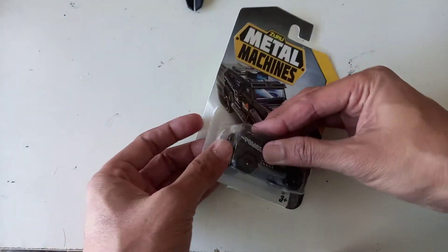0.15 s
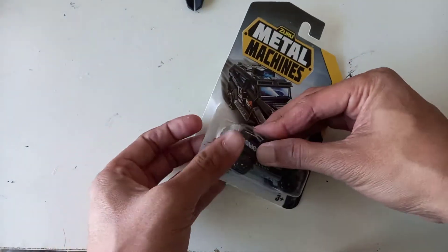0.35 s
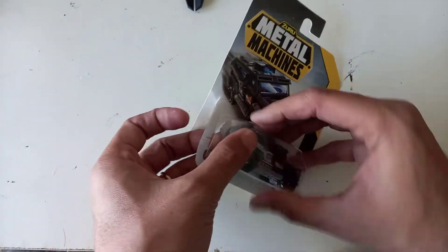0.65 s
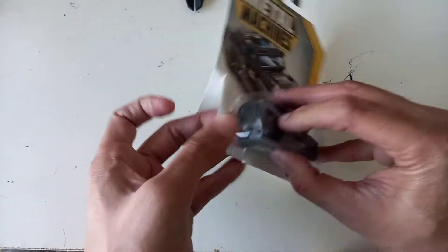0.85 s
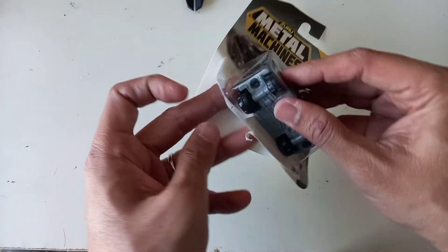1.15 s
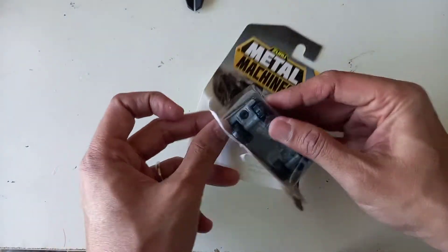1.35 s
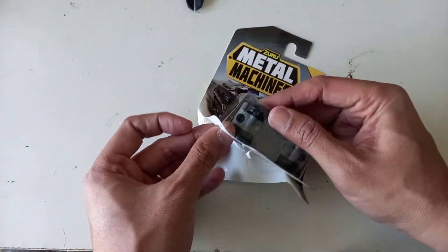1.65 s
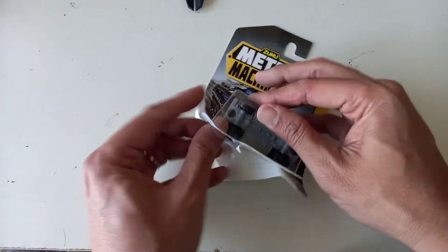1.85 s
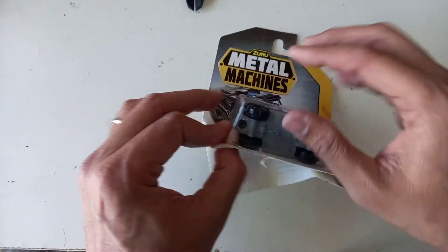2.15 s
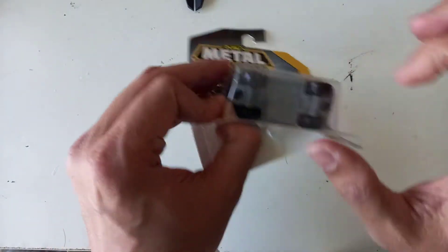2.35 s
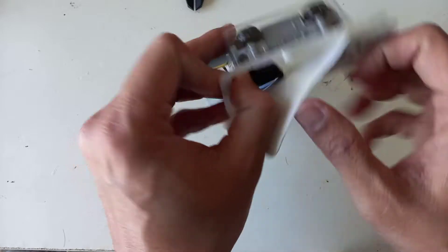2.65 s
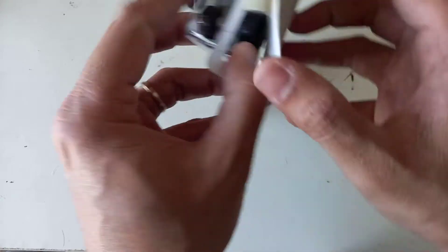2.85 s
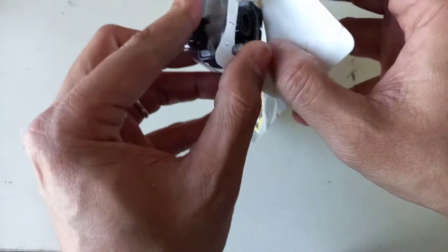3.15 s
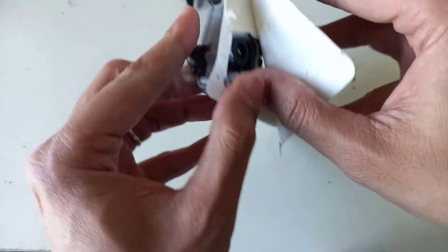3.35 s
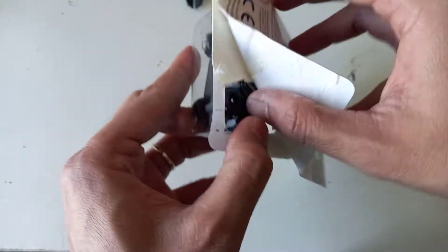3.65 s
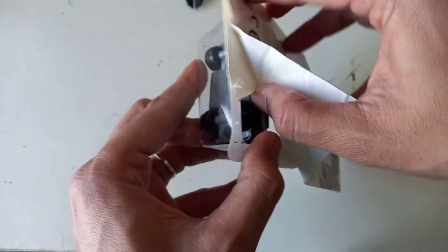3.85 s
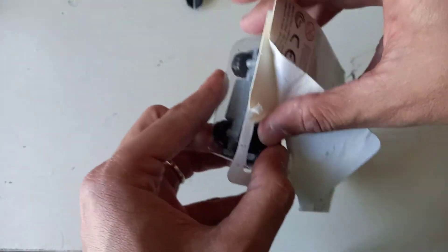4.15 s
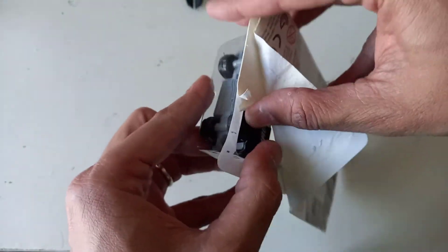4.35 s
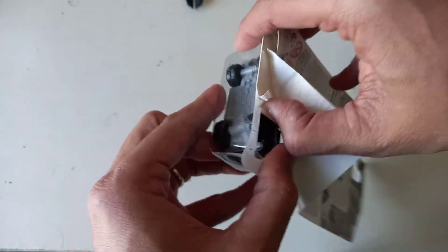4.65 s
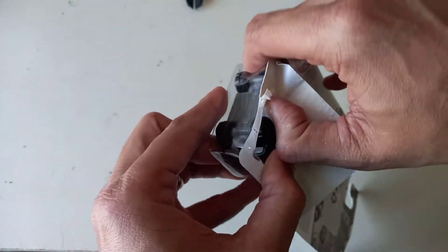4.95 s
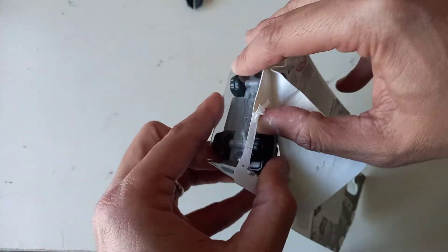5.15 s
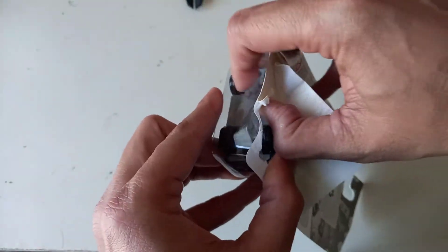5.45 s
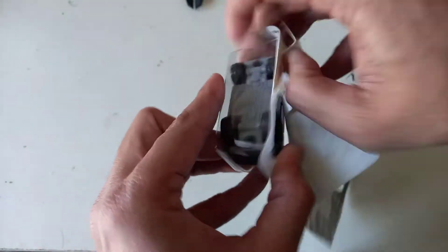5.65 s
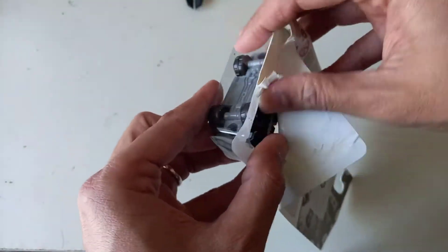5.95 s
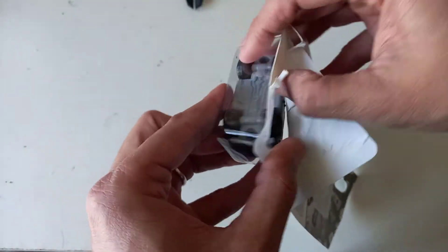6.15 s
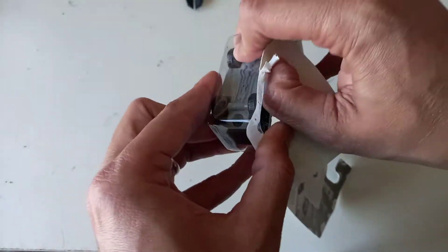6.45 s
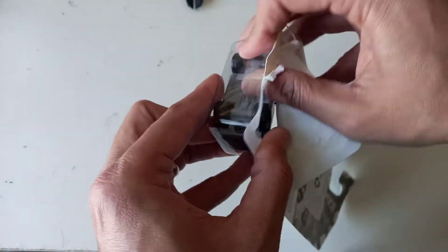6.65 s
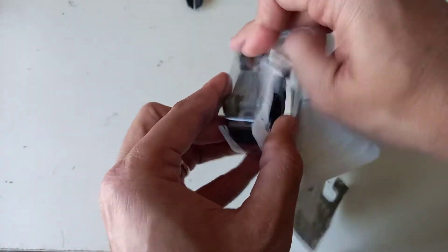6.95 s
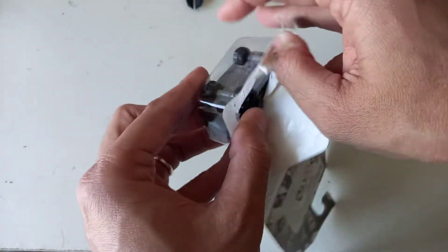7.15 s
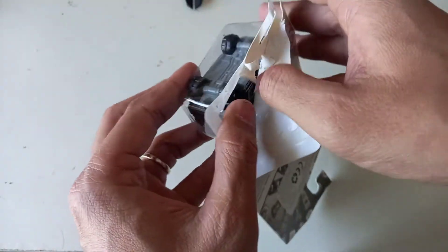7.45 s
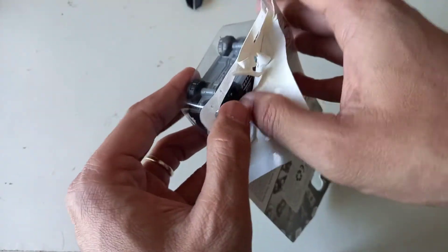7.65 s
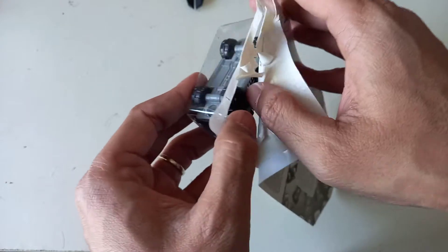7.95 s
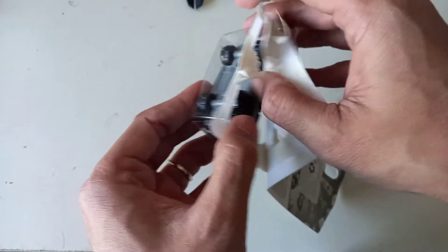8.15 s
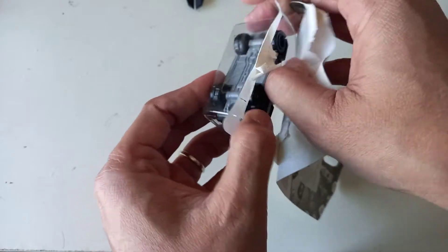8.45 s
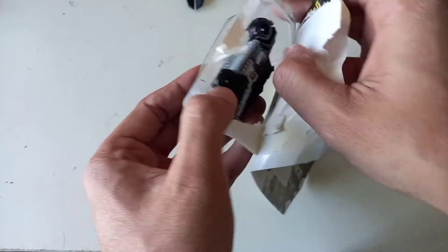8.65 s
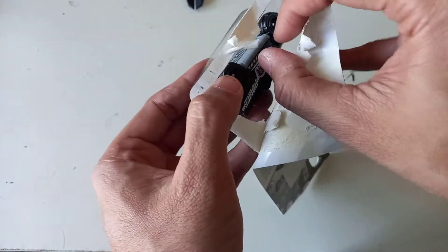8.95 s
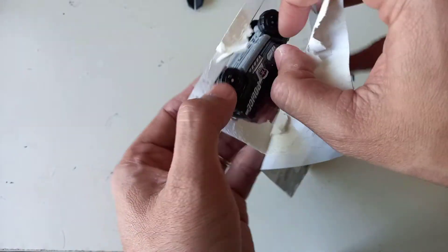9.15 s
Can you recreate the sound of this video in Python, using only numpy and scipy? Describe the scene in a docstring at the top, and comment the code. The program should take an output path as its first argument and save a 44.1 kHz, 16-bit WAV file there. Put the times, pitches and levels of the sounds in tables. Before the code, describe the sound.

Thin stiff plastic pops, creaks and crinkles as fingers tear cardboard away in short bursts, hardest around five and seven seconds, very close indoors.

```python
"""A small room, close above a table: two hands peel a card off a plastic blister pack before two microphones.
The thin shell snaps in ringing panel modes and creaks in resonances driven by slips; its hardest snap rings on.
The card gives way in band-filtered bursts of fibre breaks: short rips, fine peeling crackle, ticks and glue clicks.
Fingers rub, bump and once squeak; shaped noise makes the hands and the quiet room tone, a noise tail the room.
"""
import sys
import numpy as np
from scipy import signal
from scipy.fft import irfft, next_fast_len
from scipy.io import wavfile
from scipy.ndimage import uniform_filter1d

SR = 44100
rng = np.random.default_rng(int(sys.argv[2]) if len(sys.argv) > 2 else 0)


def transcribe(signal):
    """Save signal, clipped to [-1, 1], as a 16-bit WAV file at the path in sys.argv[1]."""
    frames = np.atleast_2d(signal).T
    limited = np.clip(frames, -1, 1)
    pcm = np.round(limited * 32767).astype(np.int16)
    wavfile.write(sys.argv[1], SR, pcm)


N = 410561
TIME = np.arange(N) / SR
HZ = np.fft.rfftfreq(next_fast_len(N, True), 1 / SR)

# levels of the pack's sounds are set before the 2 dB lift and left-right lean at the microphones
# left-right likeness of the thump, body, crack and fizz bands, in that order [0-1]
LIKENESS = [0.83, 0.4, 0.12, 0.043]
# dull noise of the hands: (frequency [Hz], relative level [dB])
HAND_SPECTRUM = [(36, -28), (50, -2.5), (64, -4.5), (105, 5), (145, -3.5), (185, 3.5), (225, -7),
                 (410, -7.5), (600, -20.5), (1500, -62.5)]
# the shell buckles: (time [s], level [dB], panel pitch [Hz], thump re level [dB], crack re level [dB])
SHELL_SNAPS = [(.5936, -41.5, 974, -2, -32), (.8426, -39.5, 1670, -9, -11), (.865, -46, 1190, -16, -23),
               (0.896, -36, 800, -2.5, -28), (0.9219, -25.5, 1185, -15, -9),
               (1.142, -30.5, 1416, -10.5, -16.5), (1.433, -25, 1173, -33, -32),
               (1.4662, -39.5, 1290, -6.5, -10.5), (1.5674, -35.5, 974, -28, -23),
               (1.7536, -26, 1185, -7, -20.5), (1.8182, -32, 1410, -15.5, -10.5),
               (1.8875, -41.5, 1700, -16, -18), (2.4, -47, 1550, -12, -11), (2.492, -50.5, 930, -10, -29),
               (2.6645, -38.5, 1320, -33, -11.5), (2.7066, -32, 1420, -24, -11),
               (2.9102, -42, 1610, 5, -34), (3.412, -46, 1620, -2, -10.5),
               (3.6355, -43.5, 1646, -6.5, -6.5), (4.082, -38, 1315, -14.5, -12),
               (4.5607, -43, 1320, -9, -10.5), (4.6519, -33.5, 1710, -2.5, 0.5),
               (4.6758, -34.5, 1574, -6, 0.5), (4.86, -36, 1420, -6, -13), (4.9027, -27.5, 1630, -13, -4.5),
               (5.0614, -31.5, 1450, -13, -17), (5.0786, -17, 1543, -14, -13.5),
               (5.2517, -45.5, 1040, -6, -6.5), (5.3211, -39.5, 1444, -7.5, -8.5),
               (5.425, -28.5, 985, -22, -14), (5.5489, -35.5, 2410, -12, -1), (5.5548, -36, 2300, -33, 6),
               (5.5892, -30, 1700, -5.5, 3), (5.7224, -36, 1530, -5.5, -16), (5.954, -48.5, 1130, 2, -6.5),
               (6.1264, -37.5, 1610, -9.5, -12), (6.1859, -45.5, 860, 7, -7), (6.2252, -40, 1820, -33, 4),
               (6.3468, -32, 2360, -15.5, -2), (6.37, -38.5, 1420, -16, -21), (6.394, -42.5, 910, 1, -6),
               (6.6536, -44, 840, 0.5, -1.5), (6.7954, -45.5, 2150, -22.5, 0),
               (6.8771, -37, 1500, -5, -6.5), (6.897, -41, 2570, -9, 9.5), (6.9111, -30.5, 1660, -7, 0),
               (6.9281, -20, 824, -14.5, -7), (6.9416, -36, 1640, -3, 7.5),
               (6.9665, -20.5, 1653, -17.5, 0.5), (7.0051, -28.5, 1390, -11.5, -25.5),
               (7.065, -24, 1500, -15, -25), (7.1057, -38, 1000, -13, 1), (7.2815, -44, 1620, -9, -11),
               (7.3743, -34, 1660, -13, -7), (7.3875, -39, 1480, 0, -5.5), (7.9921, -38, 1620, -12, -4),
               (8.1336, -34.5, 2290, -27, 4.5), (8.211, -38.5, 1380, -16, 6), (8.3938, -40, 1500, -22, 3.5),
               (8.431, -37, 1500, -18, -2), (8.4472, -40, 1890, -22, 10)]


def amp(db):
    """Decibels to gain."""
    return 10 ** (np.asarray(db) / 20)


def evened(x):
    """Scales to rms 1, over all channels together."""
    return x / np.sqrt(np.mean(x ** 2) + 1e-20)


def read(points, hz):
    """Reads a spectrum on a log-frequency axis."""
    f, value = np.transpose(points)
    return np.interp(np.log(hz + 1), np.log(f + 1), value)


def follow(rows):
    """One curve over time for each column after the first, which holds the times."""
    s, *columns = np.transpose(rows)
    return [np.interp(TIME, s, column) for column in columns]


def add(mix, s, sound):
    """Mixes a stereo sound in at time s."""
    part = mix[:, max(round(s * SR), 0):][:, :sound.shape[1]]
    part += sound[:, :part.shape[1]]


def pair(x, same):
    """Blends two unrelated rows into a left and right of the given likeness."""
    same = np.clip(same, 0, 1)
    mid = np.sqrt((1 + same) / 2) * x[0]
    side = np.sqrt((1 - same) / 2) * x[1]
    return np.array([mid + side, mid - side])


def through(x, response):
    """Passes both channels through a response."""
    return signal.oaconvolve(x, response[None], axes=1)[:, :x.shape[1]]


def pack_band(lo, hi, size=2048, order=14):
    """Card and shell colour the sound between two borders [Hz]: a causal, minimum-phase response."""
    # colour of card and shell: (frequency [Hz], relative level [dB])
    colour = [(200, -13), (410, -1), (570, -7), (790, -3), (1000, -0.5), (1650, 5), (2050, -4.5),
              (2600, -7), (3100, -10), (4500, -10), (6750, -11), (7900, -25), (12000, -20), (16000, -28)]
    hz = np.abs(np.fft.fftfreq(size, 1 / SR)) + 1
    edges = np.sqrt((1 + (lo / hz) ** order) * (1 + (hz / hi) ** order))
    gain = amp(read(colour, hz)) / edges
    log_gain = np.log(np.maximum(gain / gain.max(), 1e-4))
    # the Hilbert transform of the log gain gives the minimum phase
    spectrum = np.exp(np.conj(signal.hilbert(log_gain)))
    return np.fft.ifft(spectrum).real[:size // 2]


def murky(spectrum, same):
    """Steady stereo noise of a given spectrum, at rms 1."""
    noise = rng.standard_normal((2, len(HZ))) + 1j * rng.standard_normal((2, len(HZ)))
    return evened(irfft(pair(noise, same) * amp(read(spectrum, HZ)))[:, :N])


def clumps(length_s):
    """Random curve of rms 1: straight lines between draws that lie length_s apart."""
    draws = rng.standard_normal(N // 100)
    return evened(np.interp(TIME / length_s, np.arange(len(draws)), draws))


def fibres(count, per_s, spread_db, hiss):
    """Two rows of tiny breaks at shared moments, a few of them large, over smooth friction."""
    size = amp(spread_db * np.minimum(rng.exponential(1, count), 4))
    size *= rng.random(count) < per_s / SR
    breaks = evened(size * rng.standard_normal((2, count)))
    return breaks + hiss * rng.standard_normal((2, count))


def resonate(x, hz, width):
    """A steep two-pole-pair resonance that can follow a moving pitch; width sets its pole radius [Hz]."""
    turn = np.exp(2j * np.pi * np.cumsum(hz * np.ones(x.shape[1])) / SR)
    r = np.exp(-np.pi * abs(width) / SR)
    # turned down to 0 Hz, smoothed there and turned back up
    smooth = signal.lfilter([(1 - r) ** 2], [1, -2 * r, r * r], x / turn)
    return (turn * smooth).real


def room_tone():
    """The quiet room: steady, wide noise."""
    # (frequency [Hz], relative level [dB])
    tone = [(30, -23), (250, -10.5), (450, -5), (1200, -2.5), (1700, -8.5), (2200, -15.5), (3400, -40),
            (6700, -23.5), (7800, -47.5), (16000, -43)]
    return amp(-55.5) * murky(tone, same=0.12)


def hands():
    """Fingers knead and bump the pack: a deep rumble under a hollow murmur that comes and goes."""
    # how firmly the hands knead: (time [s], level [dB])
    grip = [(0, -49.5), (4.4, -49.5), (5.0, -48), (5.4, -58.5), (5.62, -49), (6, -58), (6.2, -53.5),
            (7, -50.5), (7.3, -54.5), (8.05, -54.5), (8.3, -49), (8.65, -47), (8.9, -52)]
    # a finger shifts its hold with a soft bump: (time [s], level [dB])
    shifts = [(.2, -47), (1.45, -45), (1.82, -44.5), (2.28, -49), (2.5, -49.5), (2.95, -45)]
    bump_s = 0.043  # from a bump's peak to 1/e of it
    noise = murky(HAND_SPECTRUM, same=0.94)
    deep = signal.sosfiltfilt(signal.butter(4, 150, fs=SR, output="sos"), noise)
    murmur = noise - deep
    lumpy = deep * amp(0.85 * clumps(0.18)) + murmur * amp(1.9 * clumps(0.078))
    bumps = sum(amp(db) * np.exp(-((TIME - s) / bump_s) ** 2) for s, db in shifts)
    return np.hypot(amp(follow(grip)[0]), bumps) * evened(lumpy)


def pulling():
    """Level and brightness [dB] over time: pulls tighten, sag as the card gives, slacken and blend."""
    # pulls on the card: (time when taut [s], held [s], level [dB], brightness re level [dB])
    pulls = [(0, 0.26, -54.5, -10), (.62, 0.22, -58.5, -5.5), (0.791, 0.12, -48.5, -4),
             (1.154, 0.068, -49, 1.5), (1.3, 0.13, -48, 3.5), (1.54, 0.094, -52.5, -7),
             (1.81, 0.12, -48, -2), (2.02, 0.055, -59, -1), (2.22, 0.23, -56.5, -2),
             (2.68, 0.13, -49, -4.5), (2.965, 0.024, -44, -3), (3.09, 0.48, -61, 2.5),
             (3.641, 0.065, -58, -3.5), (3.878, 0.12, -53, -4.5), (4.01, 0.056, -45.5, -4),
             (4.3, 0.085, -54.5, 0), (4.38, 0.18, -58, 5), (4.838, 0.068, -48.5, -1),
             (5.57, 0.15, -46.5, -1.5), (5.8, 0.1, -54, 0), (6.121, 0.087, -56, -1),
             (6.552, 0.15, -50.5, -2), (6.8, .08, -54, 0.5), (6.9, 0.25, -46.5, 3.5),
             (7.16, 0.11, -54.5, -1.5), (7.36, 0.18, -56.5, -2), (7.85, 0.12, -61.5, -3.5),
             (8, 0.46, -52, -9), (8.43, 0.14, -49.5, 1), (9.055, 0.18, -56, 1.5)]
    tighten, sag, slacken = 335, 18, 172.5  # dB per s
    touch_db, touch_bright_db = -75, -6  # between pulls the fingers only rest on the card
    t = np.arange(0, N / SR, 1 / 400)  # 400 control points per s
    s, held, db, bright_db = np.transpose(pulls)[:, :, None]
    early = np.maximum(s - t, 0)
    taut = np.clip(t - s, 0, held)
    late = np.maximum(t - s - held, 0)
    level = db - tighten * early - sag * taut - slacken * late
    body = np.hypot(np.linalg.norm(amp(level), axis=0), amp(touch_db))
    treble = np.hypot(np.linalg.norm(amp(level + bright_db), axis=0), amp(touch_db + touch_bright_db))
    return follow(np.transpose([t, 20 * np.log10(body), 20 * np.log10(treble / body)]))


def peel(bands):
    """Glue and fibres part in clumps, coarse and fine ones each in their own band."""
    db, bright_db = pulling()
    # a light touch only slides, a hard pull breaks fibres
    slide = 1.5 * amp(-.45 * (db + 38.5))
    catch = amp(3.46 * clumps(0.022)) / np.sqrt(1 + slide ** 2)
    treble_db = db + bright_db
    fizz_db = treble_db - 8.0 + 0.2 * (treble_db + 50.0)  # stronger treble reaches higher
    levels = [db - 5.5, db + 0.5, treble_db - 2.5, fizz_db]
    out = np.zeros((2, N))
    for band, same, level in zip(bands, LIKENESS, levels):
        breaks = fibres(count=N, per_s=420, spread_db=1.5, hiss=slide) * catch
        crackle = through(pair(breaks, same), band) * amp(2.0 * clumps(0.014))
        out += amp(level) * evened(crackle)
    return out


def ticks(bands, count=900, size=700):
    """Small stiff facets and fibres tick dryly, each at its own pitch, following the pull up to a limit."""
    low_hz, octaves, t60 = 990, 2.0, 0.014  # lowest pitch, range above it, ring time of the tone [s]
    db, bright_db = pulling()
    t, out = np.arange(size) / SR, np.zeros((2, N))
    fade = amp(-60 * t / t60)
    for when, strength, pitch, reach in rng.random((count, 4)):
        at = int(when * N)
        # the grit dies twice as fast as the tone
        grit = pair(rng.standard_normal((2, size)), LIKENESS[2]) * fade ** 2
        hz = low_hz * 2 ** (octaves * pitch)
        ring = np.sin(2 * np.pi * hz * t + rng.standard_normal((2, 1))) * fade
        crack, fizz = (evened(through(grit, band)) for band in bands[2:])
        treble = crack + amp(-14.0 + 13 * reach) * fizz
        tick = 1.4 * evened(ring) + amp(bright_db[at]) * treble
        tick_db = min(db[at], -48) - 18 + 12.9 * strength ** 2
        add(out, at / SR, amp(tick_db) * tick)
    return out


def creaks(bands):
    """Panels rub: quick slips swell and stop, singing in one panel and the whole shell, with grit on top."""
    # (time of peak [s], peak to 1/e [s], level [dB], panel pitch [Hz], grit re level [dB])
    rubs = [(0.232, 0.0071, -45, 1570, -27), (1.944, 0.013, -43, 1480, -26),
            (2.766, 0.0081, -29.5, 1580, -8.5), (3.987, 0.0056, -36.5, 1600, -23),
            (4.044, 0.0095, -35, 970, -7.5), (7.419, 0.011, -42.5, 1640, -2.5),
            (8.673, 0.0085, -35, 1490, -3)]
    shell_hz, shell_db, width_hz = 1330, -2, 270  # shell level is relative to the panel
    out, t = np.zeros((2, N)), TIME[:SR // 5] - .1
    for s, half, db, panel_hz, grit_db in rubs:
        swell = np.exp(-abs(t / half))
        slips = rng.standard_normal((2, len(t)))
        driven = pair(slips, LIKENESS[0])
        panel, shell = (evened(resonate(driven, hz, width_hz) * swell) for hz in (panel_hz, shell_hz))
        grit = evened(through(pair(slips, LIKENESS[2]), bands[2] + bands[3]) * swell)
        creak = panel + amp(shell_db) * shell + amp(grit_db) * grit
        add(out, s + t[0], amp(db) * np.sqrt(np.mean(swell ** 2)) * creak)
    return out


def snap(bands, db, hz, t60, thump_db, crack_db, size=2500):
    """A panel flips: a blow and a shiver of the shell; its two lowest modes ring, its crease pings."""
    crease_hz, quick_share = 4404, 0.82  # middle ping pitch; treble ring time as a share of the panel's
    t, t60 = np.arange(size) / SR, max(t60, .005)
    rise = 1 - np.exp(-t / 0.0002)
    fade, quick = (rise * amp(-60 * t / ring_s) for ring_s in (t60, quick_share * t60))
    fizz_db = 1.08 * crack_db - 8.0  # the sharper the crack, the higher it reaches
    parts = []
    for band, same, decay in zip(bands, LIKENESS, [fade, fade, quick, quick]):
        shiver = pair(rng.standard_normal((2, size)), same) * decay
        drive = 3.9 * shiver / np.linalg.norm(shiver[0])
        drive[:, np.argmax(decay)] += 1  # the blow lands at the peak of the shiver's envelope
        parts.append(evened(through(drive, band)))
    # each mode reaches each microphone at its own phase
    phases = 0.38 * rng.standard_normal((2, 2, 1))
    upper_hz = hz * rng.uniform(1.5, 1.6)
    ring = np.sin(2 * np.pi * hz * t + phases[0])
    ring = ring + 0.18 * np.sin(2 * np.pi * upper_hz * t + 2 * phases[1])
    # a small, high panel radiates little far below its pitch
    small = signal.butter(2, hz / 2, "highpass", fs=SR)
    parts[1] = evened(evened(signal.lfilter(*small, parts[1])) + evened(ring * fade))
    ping_hz = crease_hz * 2 ** rng.uniform(-.5, .5)
    ping = np.sin(2 * np.pi * ping_hz * t + rng.standard_normal((2, 1)))
    parts[2] = evened(parts[2] + 0.44 * evened(ping * quick))
    band_levels = [thump_db, 0, crack_db, fizz_db]
    sound = sum(amp(db + band_db) * part for band_db, part in zip(band_levels, parts))
    # each level counts the band's whole energy as if spread over 10 ms
    return sound * np.sqrt(.01 * SR / size)


def snaps(bands):
    """The big flips of the shell: a bigger panel thumps more and rings longer."""
    out = np.zeros((2, N))
    for s, db, hz, thump_db, crack_db in SHELL_SNAPS:
        # 25 ms at a thump of -15 dB; the ring time grows 0.25 dB per dB of thump
        t60 = 0.025 * amp(0.25 * (thump_db + 15.0))
        add(out, s, snap(bands, db, hz, t60, thump_db, crack_db))
    return out


def clicks(bands):
    """Spots of glue part with thin clicks: all treble, too small to move a panel."""
    # (time [s], crack level [dB], fizz re crack [dB])
    glue_spots = [(1.1144, -52.5, 8), (1.5375, -53, -11), (4.389, -60, 12), (4.4166, -57, 12.5),
                  (4.4946, -55, 10), (4.963, -54, -3), (5.519, -47.5, -4), (5.5384, -43, 1),
                  (6.1735, -54.5, 3), (7.917, -55.5, -12), (8.375, -46, -13)]
    t60 = 0.036  # slope of the fade [s per 60 dB]; each click stops after 10 ms
    out, t = np.zeros((2, N)), TIME[:SR // 100]
    for s, db, fizz_db in glue_spots:
        grit = pair(rng.standard_normal((2, len(t))), LIKENESS[2]) * amp(-60 * t / t60)
        crack, fizz = (evened(through(grit, band)) for band in bands[2:])
        add(out, s, amp(db) * (crack + amp(fizz_db) * fizz))
    return out


def rips(bands, size=1024):
    """A dense avalanche of breaking fibres swells and stops; the give jolts the hands."""
    # a strip lets go: (time [s], length [s], level [dB], then thump, crack, fizz re level [dB])
    strips = [(1.274, 0.14, -50.5, -12, -7, -8.5), (2.99, 0.026, -34.5, -7.5, -9, -7.5),
              (3.513, 0.084, -48, -6.5, -10.5, -10), (5.544, 0.059, -43, -12, -2, -5),
              (5.584, .022, -29, -5.5, -0.5, -6.5), (5.653, 0.062, -44.5, -13, 3.5, -1.5),
              (5.824, 0.027, -37.5, -12.5, -10.5, -18.5), (5.855, 0.026, -42, -10, -8.5, -15),
              (6.92, .021, -23, -12, -7.5, -9), (8.223, 0.048, -41.5, -12, -3, -9),
              (8.52, 0.057, -38.5, -20, -1, -1), (9.021, 0.039, -49.5, -1.5, -9.5, -10.5)]
    out = np.zeros((2, N))
    jolt = murky(HAND_SPECTRUM, same=LIKENESS[0])
    for s, length, db, thump_db, crack_db, fizz_db in strips:
        count = int(max(length, .005) * SR)
        breaks = fibres(count=count, per_s=3500, spread_db=1, hiss=0.5)
        # fibres give way in small bundles
        crunch = amp(2.2 * clumps(0.0018)[:count])
        burst = crunch * breaks * signal.windows.tukey(count, .7)
        burst = np.pad(burst, ((0, 0), (0, size)))  # room for the bands to ring out
        share = np.sqrt(count / (count + size))  # makes the level that of the strip without its padding
        for band, same, band_db in zip(bands, LIKENESS, [thump_db, 0, crack_db, fizz_db]):
            part = evened(through(pair(burst, same), band))
            add(out, s, amp(db + band_db) * part * share)
        push = jolt[:, round(s * SR):][:, :count + size]
        add(out, s, amp(db + thump_db - 4.5) * push * signal.windows.tukey(push.shape[1], .5))
    return out


def squeaks():
    """Skin sticks and slips on the smooth shell at an unsteady rate that falls as the finger slows."""
    # (time [s], starting pitch [Hz], level [dB])
    slips = [(3.261, 6860, -51)]
    length_s, fall, jitter_hz = 0.023, 37600, 500  # fall in Hz per s
    out, t = np.zeros((2, N)), TIME[:int(length_s * SR)]
    for s, hz, db in slips:
        pitch = hz - fall * t + jitter_hz * clumps(0.0016)[:len(t)]
        tone = np.sin(2 * np.pi * np.cumsum(pitch) / SR + rng.standard_normal((2, 1)))
        add(out, s, amp(db) * evened(tone * np.hanning(len(t))))
    return out


def after_ring():
    """The shell shudders on after its hardest snap; its resonances sink in pitch as it relaxes."""
    # (starting frequency [Hz], level before the fade [dB])
    resonances = [(1320, -32), (2550, -36), (4300, -40.5)]
    t60, sag, width_share = 0.42, 0.76, 0.15  # s, octaves per s, share of the starting frequency
    out, t = np.zeros((2, N)), TIME[:SR // 2]
    s = max(SHELL_SNAPS, key=lambda row: row[1])[0]
    for hz, db in resonances:
        shudder = pair(rng.standard_normal((2, len(t))), LIKENESS[1])
        ring = resonate(shudder, hz * 2 ** (-sag * t), width_share * hz)
        add(out, s, amp(db - 60 * t / t60) * evened(ring))
    return out


def flexing(x, depth_db=3.0):
    """The bending pack's resonances come and go: random patches of time and frequency, alike left and right."""
    z = signal.stft(x, nperseg=512)[2]
    patches = rng.standard_normal(z.shape[1:])
    patches = uniform_filter1d(patches, size=6, axis=0)
    patches = uniform_filter1d(patches, size=5, axis=1)
    gain = evened(amp(depth_db * evened(patches)))
    return signal.istft(z * gain)[1][:, :N]


def room(x, t60=0.33, gap=0.00099):
    """A small room: a short, dense noise tail that starts after a gap [s]."""
    t = TIME[:SR // 2]
    tail = pair(rng.standard_normal((2, len(t))), 0.17) * (t > gap) * amp(-60 * t / t60)
    return signal.oaconvolve(x, tail / np.linalg.norm(tail[0]), axes=1)[:, :N]


def scene():
    """The pack sits a little nearer the left microphone; hands and room tone lie beneath."""
    # borders of the thump, body, crack and fizz bands [Hz]
    borders = [260, 700, 2800, 7400, 16000]
    # the pack drifts to the left as it is opened: (time [s], left minus right [dB])
    drift = [(0, 0.5), (9.3, 1)]
    bands = [pack_band(lo, hi) for lo, hi in zip(borders, borders[1:])]
    pops = snaps(bands) + clicks(bands)
    tearing = flexing(rips(bands) + peel(bands)) + creaks(bands) + ticks(bands) + squeaks()
    left, right = pops + tearing + after_ring()
    lean = amp(follow(drift)[0] / 2)
    # the right microphone hears the pack two samples later
    direct = amp(2.0) * np.array([left * lean, np.roll(right, 2) / lean])
    # the hardest pops flex the whole shell, which sends more of the sound into the room
    force = np.sqrt(abs(uniform_filter1d(pops[0] ** 2, SR // 100)))
    send = amp(-8.5) * pops * (1 + 3 * force) + amp(-9.0) * tearing
    return direct + room(send) + hands() + room_tone()


def record(dry):
    """Full-scale ceiling, then a linear-phase band limit at 16.2 kHz with its delay taken out."""
    limited = np.pad(np.clip(dry, -1, 1), ((0, 0), (0, 255)))
    lowpass = signal.firwin(511, 16200, window=("kaiser", 9), fs=SR)
    return through(limited, lowpass)[:, 255:]


dry = scene()
out = record(dry)
transcribe(out)
```